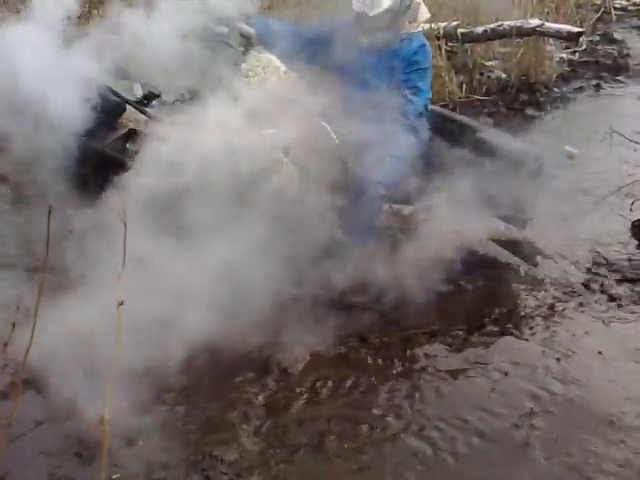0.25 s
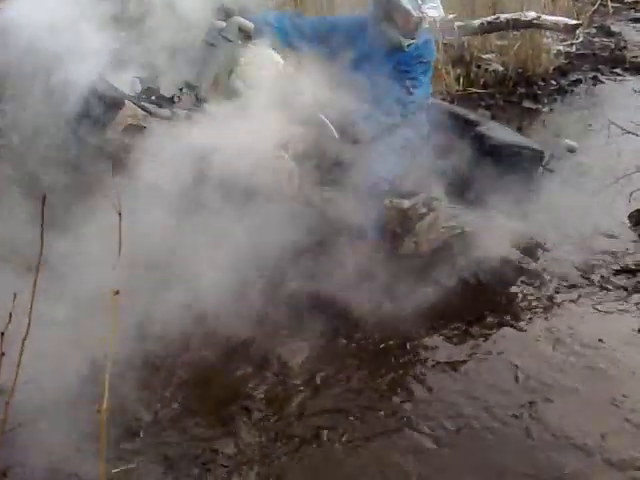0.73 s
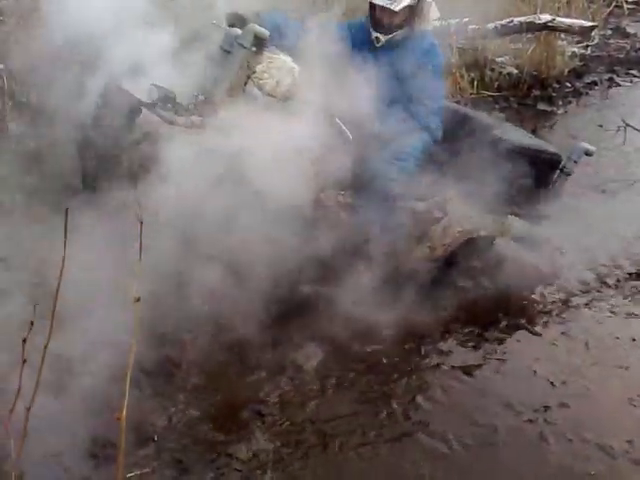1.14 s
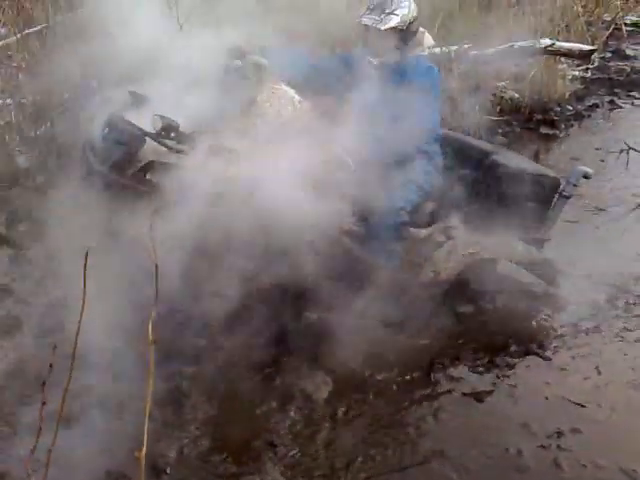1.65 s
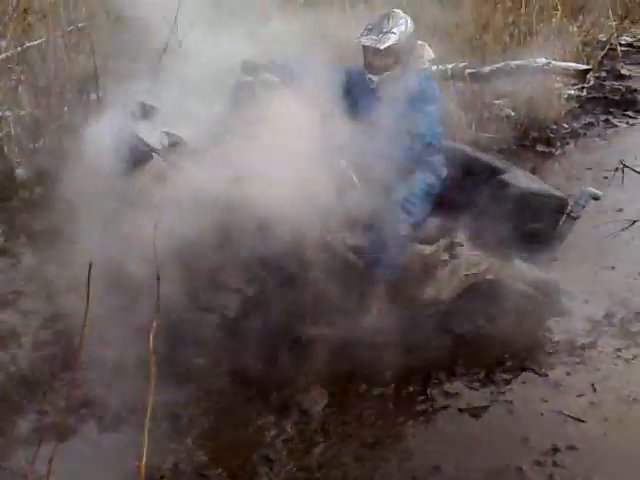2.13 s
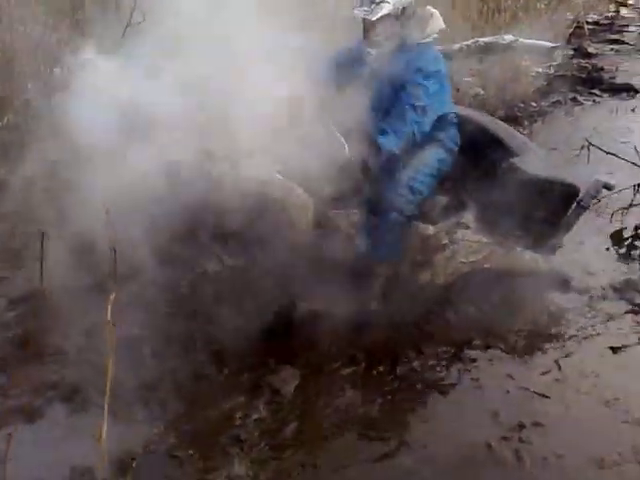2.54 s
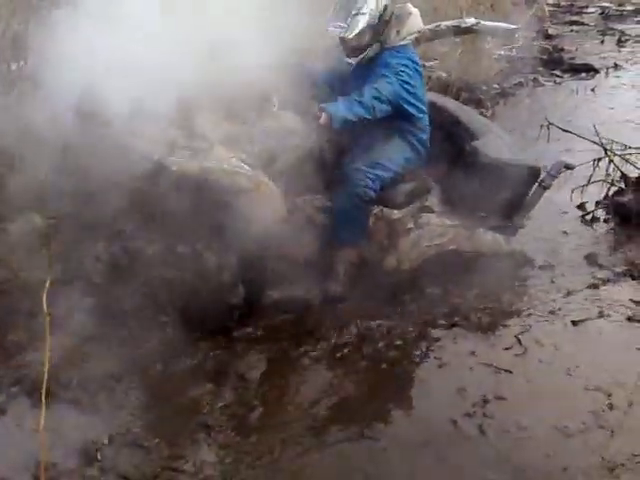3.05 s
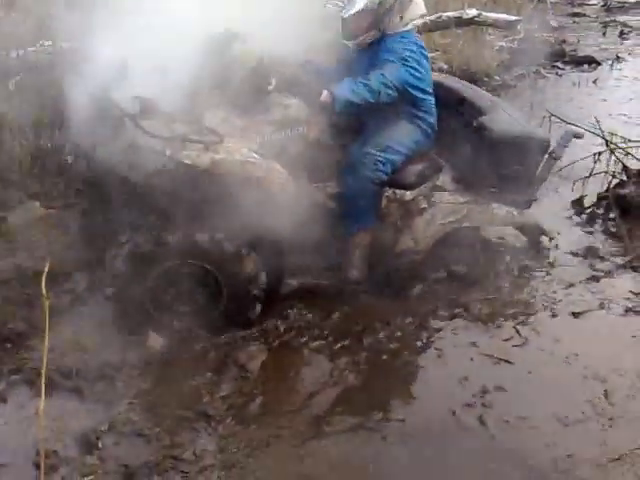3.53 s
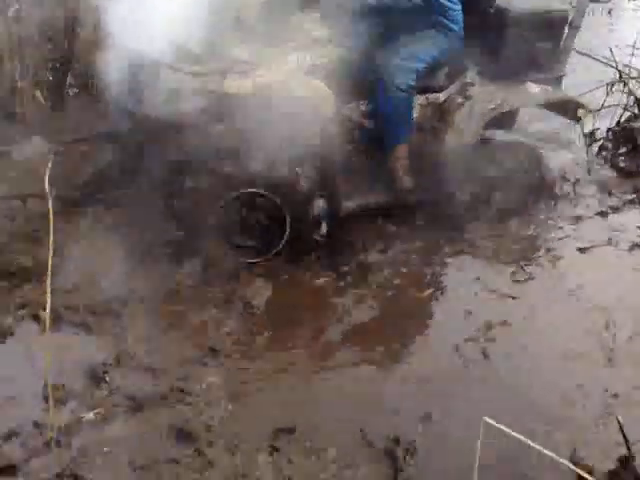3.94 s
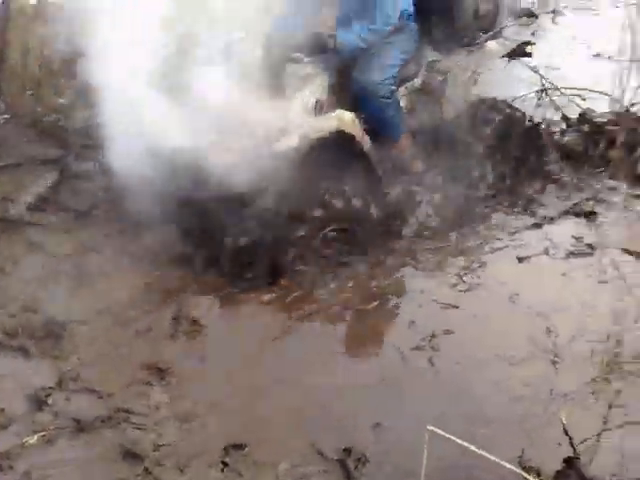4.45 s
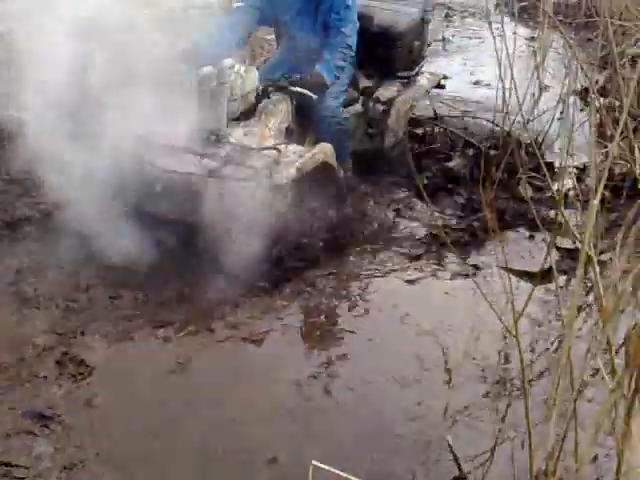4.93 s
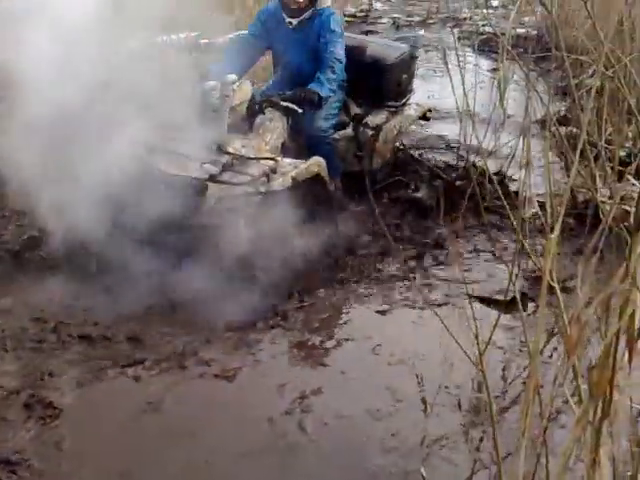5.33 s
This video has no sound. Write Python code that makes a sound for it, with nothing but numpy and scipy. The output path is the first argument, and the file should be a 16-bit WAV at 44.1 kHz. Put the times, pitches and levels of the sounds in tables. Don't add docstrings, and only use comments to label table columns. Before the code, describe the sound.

A single-cylinder quad bike labours close by in deep mud, booming and knocking unevenly, revs sagging twice, then water spatters over its hot exhaust.

```python
import sys
import numpy as np
from scipy import signal
from scipy.fft import rfft, irfft, next_fast_len
from scipy.io import wavfile

SR = 44100
rng = np.random.default_rng(int(sys.argv[2]) if len(sys.argv) > 2 else 0)


def dump(signal):
    limited = np.clip(np.atleast_2d(signal).T, -1, 1)
    pcm = np.round(limited * 32767).astype(np.int16)
    wavfile.write(sys.argv[1], SR, pcm)


def rack_gain(trim_db):
    fader = np.asarray(trim_db, float)
    return 10 ** (fader / 20)


N = 246519
USUAL_RATE = 26


def rms_one(x):
    return x / np.sqrt(np.mean(x ** 2) + 1e-20)


def drift(rate):
    r = np.exp(-80 * np.pi * rate / SR)
    slow = signal.lfilter([1], [1, -2 * r, r * r], rng.standard_normal(N // 40 + 2002))[2000:]
    return np.interp(np.arange(N) / 40, np.arange(len(slow)), rms_one(slow))


def coloured(spectrum, patchy_db):
    size = next_fast_len(N)
    hz = np.maximum(np.fft.rfftfreq(size, 1 / SR), 1)
    point_hz, point_db = np.array(spectrum, float).T
    shape = rack_gain(np.interp(np.log(hz), np.log(point_hz), point_db, left=-120, right=-120))
    noise = rfft(rng.standard_normal(size)) * shape
    out = 0
    lowest, highest = int(np.log2(point_hz[0])), int(np.log2(min(point_hz[-1], SR / 2))) + 1
    for octave in range(lowest, highest + 1):
        part = np.clip(1 - np.abs(np.log2(hz) - octave), 0, 1)
        out = out + irfft(noise * part, size)[:N] * rack_gain(patchy_db * drift(22.7))
    return rms_one(out)


def rise(t, start_s, span_s):
    return np.sin(np.pi / 2 * np.clip((t - start_s) / span_s, 0, 1)) ** 2


def engine(s):
    # time in seconds, firings per second, knock of a burnt stroke in dB, its gas blast in dB,
    # ring of the upper silencer chambers in dB.
    running = [(0, 25.1, -9, -47.5, -2), (.27, 26.3, -10, -36.5, -4), (1.25, 26.5, -10, -32.5, -1),
               (1.4, 16.4, -14, -34, -11), (1.939, 16.5, -13, -33.5, -11), (2.03, 24.5, -4.5, -31.5, 3.5),
               (2.25, 29.8, -4.5, -30, 2), (2.461, 32.3, -7.5, -34.5, -11), (2.6, 18, -7, -35.5, -1.5),
               (3.2, 12.7, -1, -45, -1), (3.33, 20.8, -8.5, -40, 0.5), (3.521, 25.4, -5.5, -39, 0),
               (3.671, 27, -12.5, -43, -4), (3.75, 25.8, -10, -46.5, -16), (4.2, 25.7, -7, -45, -6),
               (4.44, 24.3, -4.5, -51, -7), (4.598, 25.9, -11.5, -42, 1.5), (5.59, 26, -13, -52, -1)]
    when, *columns = np.transpose(running)
    return [np.interp(s, when, column) for column in columns]


def burnt_times(unburnt_s, misfired):
    late, catch_up = 0.1354, 0.0806
    t = np.arange(N) / SR
    cycle = np.cumsum(engine(t)[0]) / SR
    at = np.interp(unburnt_s, t, cycle)
    first = (at + 1 - catch_up * misfired)[:-1]
    last = (at - 1 - late * misfired)[1:]
    out = []
    for a, b, cold in zip(first, last, misfired):
        count = round(b - a) + 1
        angles = np.linspace(a, b, count) if count > 1 else [(a + b) / 2] * max(count, 0)
        times = np.interp(angles, cycle, t)
        out += [(s, cold and k == 0) for k, s in enumerate(times)]
    return np.transpose(out)


def burnt_strokes(unburnt_s, misfired):
    # pitch in Hz, boom in dB, knock in dB, echo in dB, blast in dB.
    scatter = [2.5, 1.6, 1.5, 6.0, 1.0]
    # time in seconds, extra boom in dB, extra
    # knock in dB, extra blast in dB.
    odd_strokes = [(.7837, -1.5, 3, 2.5), (.8598, -3, -3.5, 2.5), (.9373, -5, -0.5, 1.7),
                   (1.1333, -2, 1, 3.5), (1.2067, -11, 1, -1.5), (1.984, -1.5, .1, 5),
                   (2.145, 4, -4.5, -3.5), (2.2504, 3, -4, -2.5), (2.3806, -4, 0.5, -0.5),
                   (2.443, 2, -2, 2), (3.453, -1.5, 4, 1.5), (3.494, 5, -4, -4), (3.5723, -0.5, -2, -8),
                   (3.611, 2.5, 2.5, 2), (3.6855, -4, 1.5, -1), (3.7647, 5, 1.5, 6), (3.8043, 1, -2, -3),
                   (3.9202, -4, 0, -5), (4.2304, -11, 1.5, 1), (4.5524, -1, -2, 13),
                   (4.5915, .1, -0.5, -11), (4.707, 0, -3, 8), (4.7874, .1, 3.5, -12), (4.8251, -4, -3, 7),
                   (4.9027, -2.5, 0, -13), (4.9815, -25, -3, -4), (5.2557, -12, 1, 5), (5.3727, -1, 1, 3),
                   (5.5243, 0.5, -18, 2)]
    s, cold = burnt_times(unburnt_s, misfired)
    rate, knock_db, blast_db, _ = engine(s)
    fast = rate - USUAL_RATE
    pipe_hz = 116.9 + 1.6 * fast - 4 * cold
    boom_db = -15.5 - 0.82 * fast - 2 * cold
    echo_db = -42.5 - 3.5 * np.minimum(fast, 0)
    burnt = np.transpose([pipe_hz, boom_db, knock_db, echo_db, blast_db + 3 * cold])
    burnt = np.c_[s, burnt + scatter * rng.standard_normal((len(s), 5))]
    crowded = rate > 30.2
    burnt[:, 1] = np.where(crowded, 3 * rate, burnt[:, 1])
    burnt[:, 2] += -3.5 * crowded
    for when, *extra_db in odd_strokes:
        burnt[np.argmin(np.abs(s - when)), [2, 3, 5]] += extra_db
    return burnt


def firing():
    # time in seconds, pipe pitch in Hz, boom in dB, knock in dB, echo in dB.
    misfires = [(0.2373, 98, -12, -10, -20), (0.3551, 93, -13, -9, -25), (0.474, 99, -11.5, -11, -32),
                (0.5922, 98, -11.5, -11, -23), (.7104, 97, -11.5, -8.5, -16.5),
                (0.8254, 82.5, -15, -13, -15), (0.9017, 96, -12.5, -14, -15),
                (0.9805, 88.5, -13, -15, -11.5), (1.06, 87, -13.5, -18, -12.5), (1.1739, 87, -11, -11, -26),
                (1.2494, 111.4, -12.5, -10, -14), (3.729, 98, -14.5, -10, -15),
                (4.6356, 100, -13.5, -8.5, -23), (4.7522, 95, -14, -16, -21), (4.8674, 90, -21, -10.5, -15),
                (4.9459, 90, -39, -27, -8.5), (5.0235, 93, -18, -10, -13), (5.1023, 78.5, -20, -11, -8.5),
                (5.2214, 119, -14, -16, -37), (5.3377, 84, -38, -12, -13), (5.4556, 87.5, -18, -23, -14),
                (5.5713, 119, -15, -23, -43)]
    # time in seconds,
    # pipe pitch in Hz, boom in dB, knock in dB, echo in dB.
    lull_chugs = [(0.0, 114.6, -13.5, -11.5, -36), (1.2902, 96, -10.5, -8.5, -13.5),
                  (1.329, 108.4, -15, -14, -31), (1.3865, 92.5, -16.5, -9, -44),
                  (1.4436, 106, -17.5, -12, -40), (1.5072, 107, -26, -16.5, -20),
                  (1.542, 87.5, -17.5, -24, -48), (1.5693, 92, -21.5, -23, -11),
                  (1.629, 98, -16.5, -16.5, -37), (1.6615, 99, -26, -23, -44), (1.7093, 90, -19, -23, -8.5),
                  (1.7816, 89, -13, -24, -36), (1.8093, 94, -18, -20, -47), (1.8575, 98, -18, -26, -11.5),
                  (1.8974, 86, -15, -15, -40), (1.929, 111, -15, -5, -13.5),
                  (2.507, 130, -16, -11, -42), (2.539, 115, -12, -31, -42), (2.576, 106.5, -16, -18, -42),
                   (2.6269, 101, -9, -8, -34), (2.6723, 97, -14.5, -6.5, -20), (2.729, 77, -22, -8, -31),
                   (2.789, 83.5, -17, -34, -17), (2.8023, 102, -15.5, -47, -40),
                   (2.845, 85, -21, -43, -15.5), (2.8881, 91, -18, -14, -44), (2.9234, 82.5, -44, -13, -40),
                   (2.976, 104.5, -20, -15, -20.5), (3.0532, 83, -16.5, -11, -44),
                   (3.1247, 102, -14.5, -12, -18), (3.1532, 89, -21.5, -18, -40),
                   (3.196, 86, -16.5, -8, -16)]
    # time in seconds, ring in dB.
    lower_ring = [
        (0, 4.5),
        (.35, 2),
        (1.4, -1),
        (1.92, 2.5),
        (2.48, 2.5),
        (2.56, -5),
        (3.3, 2.5),
        (3.7, -2.5),
        (4.45, 3.5),
    ]
    missed = [(*row, 1) for row in misfires]
    chugs = [(*row, 0) for row in lull_chugs]
    unburnt = np.array(sorted(missed + chugs), float)
    burnt = burnt_strokes(unburnt[:, 0], unburnt[:, 5])
    unburnt[:, 5] = engine(unburnt[:, 0])[2] - 16.5 + (unburnt[:, 3] + 11)
    rows = np.r_[burnt, unburnt]
    rows = rows[np.argsort(rows[:, 0])]
    s = rows[:, 0]
    return np.c_[rows, engine(s)[3], np.interp(s, *np.transpose(lower_ring))]


def strokes(rows, shape):
    out = np.zeros(N + SR)
    lead = SR // 100
    t = np.arange(-lead, SR // 8) / SR
    next_s = np.append(rows[1:, 0], 9)
    for row, following in zip(rows, next_s):
        at = max(round(row[0] * SR), 0)
        out[at:at + len(t)] += shape(t, following - row[0] - t, row)
    return out[lead:lead + N]


def boom(t, left, row):
    shape = rise(t, -0.011, 0.024) * np.exp(-21 * t) * rise(left, 0.0026, 0.0093)
    return rack_gain(row[2] + 4.0) * shape * np.cos(2 * np.pi * row[1] * t)


def knock(t, left, row):
    hz = 200 * np.sqrt(row[1] / 110)

    def pulse(s):
        fade = np.exp(-190 * np.maximum(s, 0))
        return rise(s, -0.0068, 0.0083) * fade * np.cos(2 * np.pi * hz * s)

    return rack_gain(row[3] - 0.6) * pulse(t) + rack_gain(row[4] + 0.9) * pulse(t - 1 / row[1])


def front(t, left, row):
    # pitch in Hz, level in dB, time to fade by 60 dB in seconds.
    chambers = [(250, -25, .16), (362, -29, .18), (408, -27, .13), (505, -33, .1), (600, -30, .14),
                (680, -25, .17), (765, -27, .14)]
    burnt = np.clip(max((row[1] - 100) / 12, (row[5] + 48) / 9), 0.3, 1)
    s = t + 0.002394
    modes = 0
    for hz, level_db, t60 in chambers:
        ring_db = row[6] if hz > 640 else row[7]
        mode_db = level_db + ring_db - 60 * s / t60 + rng.normal(0, 1.0)
        modes = modes + rack_gain(mode_db) * np.cos(2 * np.pi * hz * s)
    ringing = rise(s, -0.0013, 0.0015) * modes * rise(left, 0.001, 0.0065)
    heave = rack_gain(-23.5) * rise(t, -0.00373, 0.0011) * np.exp(-25 * t) * np.cos(2 * np.pi * 46 * (t - 0.008))
    return -burnt * (ringing + heave * rise(left, 0.001, 0.0055))


def gust(rows, decay, share, offset_db):
    def puff(t, left, row):
        return rack_gain(share * row[5] + offset_db) * rise(t, -0.0042, 0.0076) * np.exp(-decay * t)

    return strokes(rows, puff)


def exhaust(rows, wet):
    # frequency in Hz, level in dB per Hz.
    blast = [(1290, -9), (2200, -3), (2660, -20.5), (4490, -3), (5430, -13), (7660, -9), (9100, -14.5),
             (10800, -11.5), (15600, -20)]
    # frequency in Hz, level in dB per Hz.
    rough_gas = [(300, -14), (420, 6), (700, 6.5), (1000, 1), (1250, -10.5), (1600, 0), (2100, -16.5),
                 (2700, -19)]
    # frequency in Hz, level in dB per Hz.
    churning = [(60, 0.5), (90, -14.5), (170, -1.5), (280, -12.5), (400, -17)]
    hiss = gust(rows, decay=77, share=1.0, offset_db=7.5) * coloured(blast, patchy_db=0.0)
    bark = gust(rows, decay=72, share=0.63, offset_db=1.0) * coloured(rough_gas, patchy_db=1.5)
    bubbling = gust(rows, decay=25, share=0.1, offset_db=-27) + rack_gain(-31) * wet
    gurgle = bubbling * coloured(churning, patchy_db=2.5)
    clean = strokes(rows, boom) + strokes(rows, knock) + (1 - 0.4 * wet) * strokes(rows, front)
    return clean + (1 - 0.85 * wet) * hiss + bark + gurgle


def engine_case(shake):
    # frequency in Hz, level in dB per Hz.
    metal = [(280, -34), (430, -9), (800, -9), (1050, -7), (1270, -5.5), (1660, -5), (1910, -9),
             (2220, -12), (2430, -22.5), (3300, -18), (4500, -13), (5300, -30), (7500, -44), (11000, -68)]
    # frequency in Hz, level in dB per Hz.
    box = [(1500, -27), (1640, 3.5), (1720, 2), (1800, 0), (1950, -15)]
    rate, knock_db, *_ = engine(np.arange(N) / SR)
    case_db = -30 + 0.52 * (rate - USUAL_RATE) + 0.29 * (knock_db + 9.5)
    clatter = rack_gain(case_db + 0.5) * shake * coloured(metal, patchy_db=1.5)
    airbox = rack_gain(case_db - 15) * shake * coloured(box, patchy_db=3.0)
    return clatter + airbox


def steam(wet):
    # frequency in Hz, level in dB per Hz.
    hissing = [(2940, -7), (5000, -5.5), (5420, -7), (6950, 0.5), (9040, -9.5), (11900, -8), (15600, -19)]
    # time in seconds, level in dB.
    boiling = [
        (0, -54),
        (.65, -64),
        (1.05, -50.5),
        (1.5, -69),
        (1.93, -62),
        (2.25, -43),
        (2.7, -59),
        (3.3, -59),
        (4.47, -48.5),
    ]
    boil_db = np.interp(np.arange(N) / SR, *np.transpose(boiling))
    return (1 - wet) * rack_gain(boil_db + 1.8) * coloured(hissing, patchy_db=0.6)


def low_rumble():
    # frequency in Hz, level in dB per Hz.
    rumble = [(28, -25), (45, -28), (65, -20), (90, -16)]
    return rack_gain(-41) * coloured(rumble, patchy_db=2.5)


def intake():
    # time in seconds, level in dB.
    gasps = [
        (1.913, -22),
        (3.246, -18.5),
    ]
    t = np.arange(N) / SR
    rush = 0
    for s, db in gasps:
        rush = rush + rack_gain(db) * rise(t, s - 0.003, 0.01) * np.exp(-45 * np.maximum(t - s, 0))
    mid_band = signal.butter(3, [700, 2100], "band", fs=SR, output="sos")
    return rush * signal.sosfilt(mid_band, rng.standard_normal(N)) * 3


def spray(wet, shake):
    # frequency in Hz, level in dB per Hz.
    spatter = [(300, -9.5), (450, 1.5), (900, -3), (1700, -4), (2600, -19.5), (4500, -11.5), (5700, -23.5),
               (7000, -17), (9300, -23.5), (11600, -19.5), (13500, -27.5), (15900, -30)]
    # time in seconds, level in dB.
    throws = [
        (4.45, -42.5),
        (4.55, -44.5),
        (4.61, -30.5),
        (4.8, -52),
        (4.97, -34.5),
        (5.06, -37),
        (5.46, -41.5),
        (5.6, -33),
    ]
    t = np.arange(N) / SR
    water = rack_gain(-39)
    for s, db in throws:
        swell, fade = (t - s) / 0.096, (s - t) / 0.1
        water = water + rack_gain(db) * np.exp(np.minimum(swell, fade))
    return wet * water * rack_gain(9) * (0.69 + 0.14 * shake) * coloured(spatter, patchy_db=2.0)


def scene():
    rows = firing()
    wet = rise(np.arange(N) / SR, 4.39, 0.07)
    shake = 0.62 + gust(rows, decay=65, share=0.2, offset_db=7.5)
    bike = exhaust(rows, wet) + engine_case(shake) + intake()
    water_and_rumble = steam(wet) + low_rumble() + spray(wet, shake)
    return (bike + water_and_rumble)[None]


def low_pass(x):
    return signal.sosfilt(signal.butter(12, 15800, fs=SR, output="sos"), x)


def record(dry):
    thin = signal.sosfilt(signal.butter(1, 25, "high", fs=SR, output="sos"), dry)
    rounded = 0.88 * np.tanh(thin / 0.97)
    top_cut = signal.ellip(12, 0.5, 70, 15800, fs=SR, output="sos")
    return low_pass(signal.sosfilt(top_cut, rounded))


dry = scene()
out = record(dry)
dump(out)
```